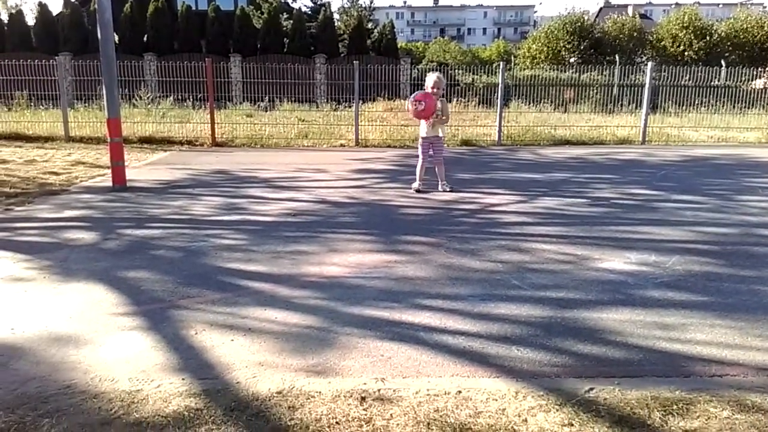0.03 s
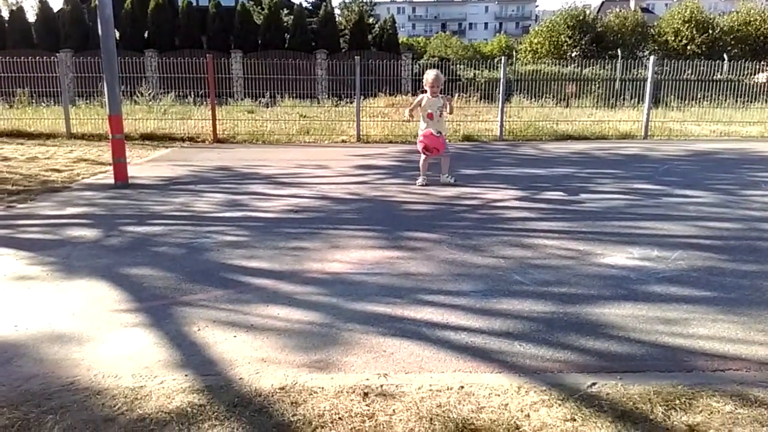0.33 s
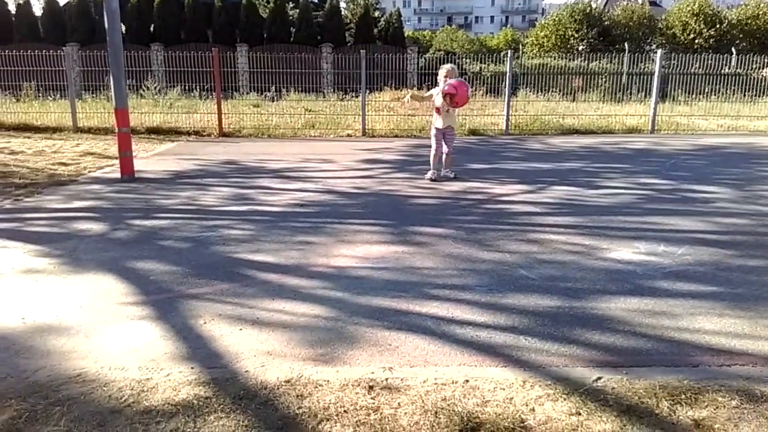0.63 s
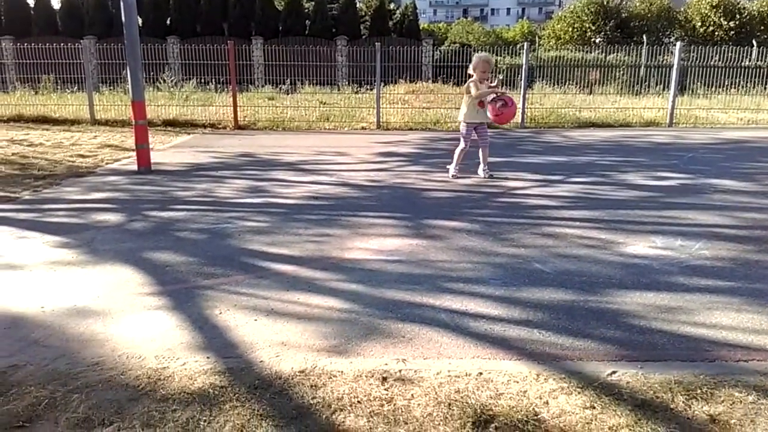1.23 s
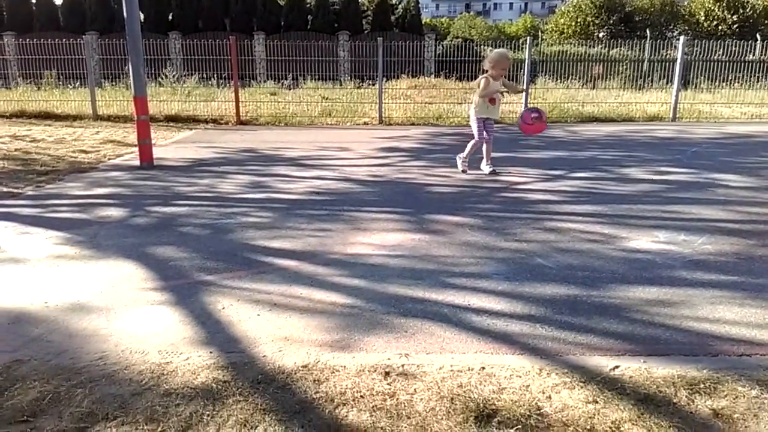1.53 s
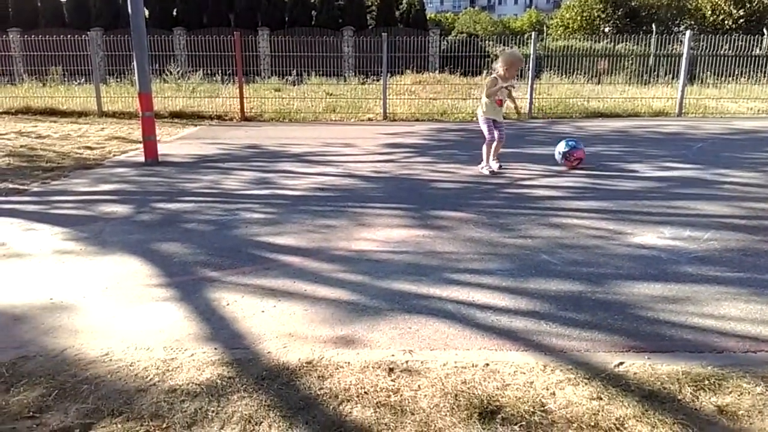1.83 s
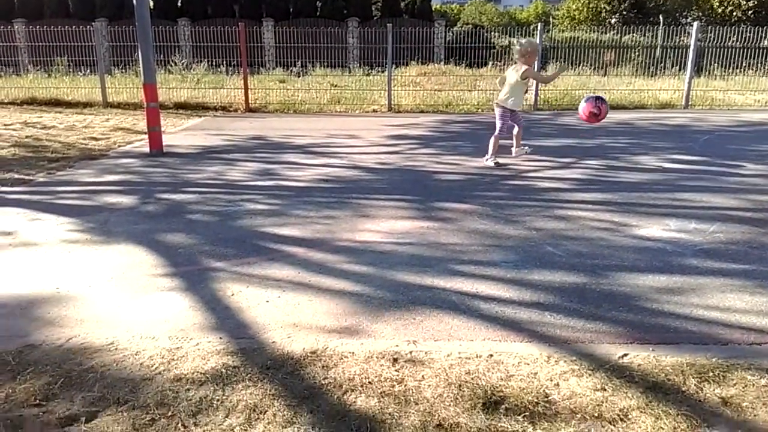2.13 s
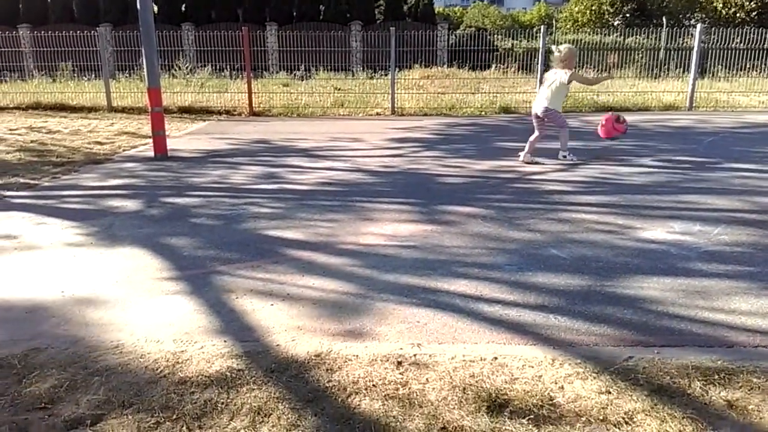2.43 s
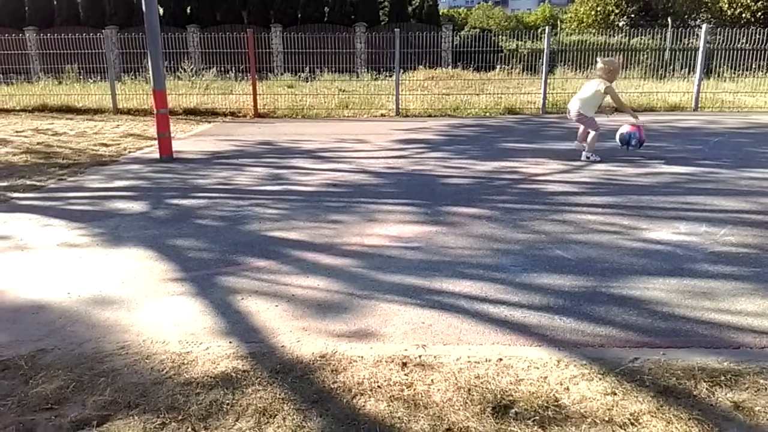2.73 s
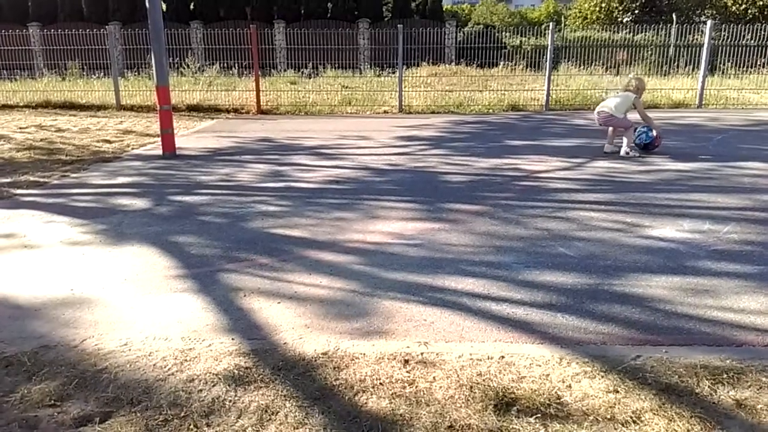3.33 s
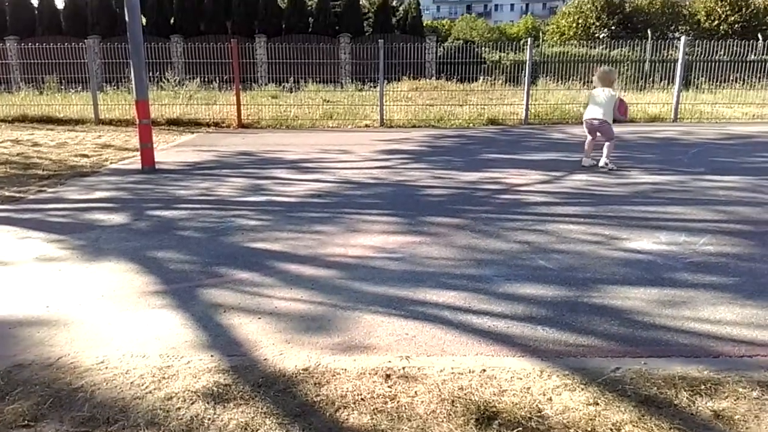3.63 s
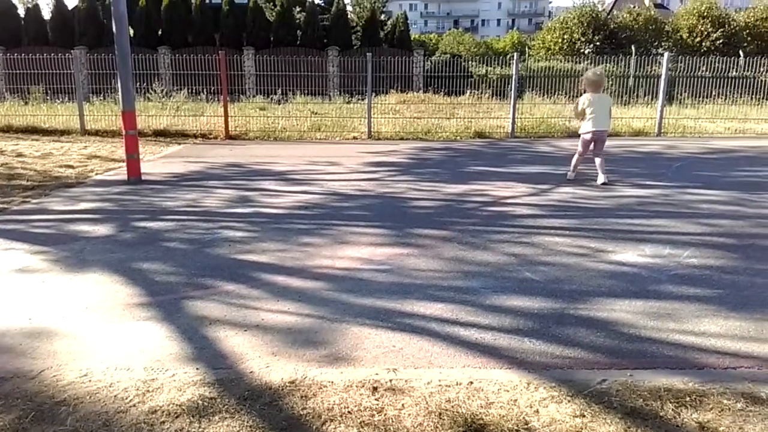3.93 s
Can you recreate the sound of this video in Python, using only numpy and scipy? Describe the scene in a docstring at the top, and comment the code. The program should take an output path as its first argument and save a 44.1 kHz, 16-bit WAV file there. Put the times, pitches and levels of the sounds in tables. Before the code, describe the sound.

A plastic ball bounces on an open paved court at about 0.3, 0.9, 1.5, 1.9, 2.4 and 2.9 seconds, sharp, briefly ringing slaps that grow softer. A far bird whistles very faintly at 0.6. Shoes and hands tap lightly from 1.2 to 3.3 seconds. A breeze rises, buffeting the microphone on the right, hardest around 3.4 seconds. Distant traffic rumbles and hisses quietly throughout.

```python
"""An open paved court, over the rumble and hiss of far traffic. An air-filled plastic ball bounces six
times, lower each time, drifting right: a sharp slap, a short ring of skin and trapped air, a soft thump
and a faint tail from fences and trees. Hollow tones linger after the first bounce, then a far bird
whistles once. Between the later bounces shoes and hands start to tap and a breeze rises, buffeting the
microphone hardest near the end, as the ball is picked up."""
import sys
import numpy as np
from scipy import signal
from scipy.fft import rfft, irfft
from scipy.io import wavfile

SR = 44100
rng = np.random.default_rng(int(sys.argv[2]) if len(sys.argv) > 2 else 0)


def put_to_file(sound):
    """Save the sound as 16-bit audio at rate SR, in the file named by the first command-line argument."""
    columns = np.atleast_2d(sound).T  # one column per channel
    safe = np.clip(columns, -1, 1)
    whole_steps = np.round(safe * 32767)
    wavfile.write(sys.argv[1], SR, whole_steps.astype(np.int16))


N = 176400


def amp(db):
    """Decibels to gain."""
    return 10 ** (np.asarray(db) / 20)


def read(points, hz):
    """Reads a curve of (frequency [Hz], value) along a log-frequency axis."""
    freqs, values = np.transpose(points)
    return np.interp(np.log(hz + 1), np.log(freqs + 1), values)


def unit(x):
    """Scales to rms 1."""
    return x / np.sqrt(np.mean(x ** 2) + 1e-20)


def add(mix, start, sound):
    """Mixes a sound in at start seconds."""
    part = mix[..., max(round(start * SR), 0):][..., :sound.shape[-1]]
    part += sound[..., :part.shape[-1]]


def noise(spectrum):
    """A steady noise bed of rms 1 with the given spectrum."""
    gain = amp(read(spectrum, np.fft.rfftfreq(N, 1 / SR)))
    return unit(irfft(rfft(rng.standard_normal(N)) * gain, N))


def colour(x, eq, tilt_db=0, size=4096):
    """Minimum-phase EQ, tilted by tilt_db per octave about 2500 Hz."""
    hz = abs(np.fft.fftfreq(size, 1 / SR))
    log_gain = np.log(amp(read(eq, hz) + tilt_db * np.log2(np.clip(hz, 400, 8000) / 2500)))
    response = np.exp(np.conj(signal.hilbert(log_gain)))
    impulse = np.fft.ifft(response).real[:size // 2]
    return signal.fftconvolve(x, impulse)[:len(x)]


def decay(t, t60):
    """An envelope that falls 60 dB in t60 seconds."""
    return np.exp(-np.log(1000) * t / t60)


def ringing(band_t60s, size):
    """Dense random ringing of energy 1, each band dying at its own speed."""
    t, hz = np.arange(size) / SR, np.fft.rfftfreq(size, 1 / SR)
    white = rfft(rng.choice([-1., 1.], size))
    centres, t60s = np.transpose(band_t60s)
    out = np.zeros(size)
    for solo, t60 in zip(np.eye(len(centres)), t60s):
        band = read(list(zip(centres, solo)), hz)
        out += irfft(white * band, size) * decay(t, t60)
    return out / np.linalg.norm(out)


def traffic():
    """Far traffic: a centred rumble under a wide, steady hiss."""
    # Spectra of the two beds: (frequency [Hz], level [dB])
    rumble_eq = [(20, -24.5), (70, 0.5), (110, 1.5), (155, -8), (300, -12.5), (420, -23.5), (3000, -69)]
    hiss_eq = [(20, -8.5), (200, -3.5), (450, -2), (950, 0), (1400, -3.5), (2100, -2.5), (2800, -10),
               (4500, -13.5), (8000, -18.5), (16000, -25)]
    rumble_db, hiss_db, right_lift_db = -53.5, -61.5, 1.5
    hiss = np.array([noise(hiss_eq), amp(right_lift_db) * noise(hiss_eq)])
    return amp(rumble_db) * noise(rumble_eq) + amp(hiss_db) * hiss


def skin_slap(t, level_db, tilt_db, crack_db):
    """The skin hits the paving with a click and rattles; harder hits click more sharply."""
    # Tone of the slap: (frequency [Hz], level [dB])
    slap_eq = [(150, -6.5), (270, -2), (450, -5.5), (1000, 2.5), (1550, -7.5), (2100, -3), (2950, -6),
               (3700, -5), (5000, -6), (7000, -6), (9500, -5), (12000, -17.5), (16000, -28)]
    # Damping of the skin: (frequency [Hz], T60 [s])
    skin_t60s = [(300, 0.085), (1000, 0.054), (3000, 0.053), (6000, 0.022), (12000, 0.02)]
    # High shelf that sets the crack: (frequency [Hz], share of crack_db [ratio])
    crack_shelf = [(6000, 0), (9500, 0.94)]
    skin_db, attack_s, click_db_per_db = -2, 0.0001, 2.55
    click = amp(click_db_per_db * level_db) * (t == 0)
    skin = amp(skin_db) * ringing(skin_t60s, len(t)) * (1 - np.exp(-t / attack_s))
    eq = [(hz, db + crack_db * read(crack_shelf, hz)) for hz, db in slap_eq]
    return amp(level_db) * colour(click + skin, eq, tilt_db)


def air_ring(t, level_db, tilt_db):
    """The trapped air rings, its modes slightly detuned on every bounce."""
    # Cavity modes: (pitch [Hz], relative level [dB], T60 [s])
    modes = [(732, 5, 0.02), (1200, -5, 0.043), (2052, 1, 0.022), (3010, 6.5, 0.019), (3038, 0.5, 0.029),
             (3010, -27.5, 0.55), (4070, -7.5, 0.05), (5010, -6, 0.036), (5900, 1, 0.017)]
    detune = 0.0092
    out = np.zeros(len(t))
    for hz, db, t60 in modes:
        low_tilt_db = tilt_db * min(np.log2(hz / 2900), 0)
        tone = np.sin(2 * np.pi * hz * rng.normal(1, detune) * t) * rng.choice([-1, 1])
        out += amp(level_db + db + low_tilt_db) * decay(t, t60) * tone
    return out


def squash_thump(t, level_db, hz, lag_s):
    """The squashed ball pushes out a low thump whose pitch sags during contact."""
    contact_s, attack_s, sag = 0.011, 0.0013, 0.25
    age = np.maximum(t - lag_s, 0)
    cycles = hz * age * (1 - sag * np.minimum(age / contact_s, 2) / 2)
    envelope = (1 - np.exp(-age / attack_s)) * np.exp(-(age / contact_s) ** 2)
    return amp(level_db) * envelope * np.cos(2 * np.pi * cycles)


def dent_pop(t, level_db):
    """The dent springs back with a short pop."""
    lag_s, hz, decay_s = 0.0052, 269, 0.0022
    age = np.maximum(t - lag_s, 0)
    return amp(level_db) * np.sin(2 * np.pi * hz * age) * np.exp(-age / decay_s)


def ball(size=8192):
    """Six layered bounces, reaching the left ear ever later as the ball drifts right."""
    # Hits: (time [s], slap [dB], tilt [dB/octave], crack [dB], air ring [dB], thump [dB],
    # thump pitch [Hz], thump lag [s], pop [dB], crack left minus right [dB])
    bounces = [(0.2967, -1, 0.5, -7.5, -42, -24, 143, 0.00014, -29, 9.5),
               (0.9463, -4, 1.7, -2.5, -38, -26, 111, 0.00028, -31.5, 9.5),
               (1.4653, -7, 1, 0, -39, -27, 115.5, 0.00075, -31.5, 3.5),
               (1.9134, -10.5, -1, -0.5, -48.5, -34, 176, 0.0042, -28.5, 10),
               (2.4291, -10.5, 4.6, -13, -43.5, -38, 90, 0.0054, -45.5, 5),
               (2.8683, -15, 3.2, -23, -44.5, -44, 110, 0.0054, -57, 18)]
    drift_s_per_s = 0.00005
    out, t = np.zeros((2, N)), np.arange(size) / SR
    for start, slap_db, tilt_db, crack_db, air_db, thump_db, hz, lag_s, pop_db, pan_db in bounces:
        body = air_ring(t, air_db, tilt_db) + squash_thump(t, thump_db, hz, lag_s) + dent_pop(t, pop_db)
        left = skin_slap(t, slap_db, tilt_db, crack_db + pan_db / 2)
        right = skin_slap(t, slap_db, tilt_db, crack_db - pan_db / 2)
        add(out[0], start + drift_s_per_s * start, left + body)
        add(out[1], start, right + body)
    return out


def court_echo(send):
    """Fences and trees scatter back a thin, short tail."""
    # Tone of the tail: (frequency [Hz], level [dB])
    tail_eq = [(100, -21), (2000, -3), (5000, 2), (9500, -0.5), (15000, 1)]
    # Length of the tail: (frequency [Hz], T60 [s])
    tail_t60s = [(200, 0.12), (4500, 0.22), (15000, 0.25)]
    return_db, attack_s = -14.5, 0.0033
    swell = np.minimum(np.arange(SR) / SR / attack_s, 1) ** 2
    tails = [colour(ringing(tail_t60s, SR) * swell, tail_eq) for _ in send]
    return amp(return_db) * np.array([signal.fftconvolve(x, tail)[:N] for x, tail in zip(send, tails)])


def hollow_tones(size=16384):
    """Faint, uneven tones linger after the first and hardest bounce."""
    # Narrow bands of noise: (time [s], centre [Hz], level [dB])
    tones = [(0.317, 4330, -61), (0.32, 5100, -59.5)]
    width_hz, attack_s, t60 = 330, 0.009, 0.25
    out, t = np.zeros((2, N)), np.arange(size) / SR
    envelope = (1 - np.exp(-t / attack_s)) * decay(t, t60)
    for start, hz, db in tones:
        band = 1 / (1 + (2 * (np.fft.rfftfreq(size, 1 / SR) - hz) / width_hz) ** 2)
        tone = unit(irfft(rfft(rng.standard_normal((2, size))) * band))
        add(out, start, amp(db) * envelope * tone)
    return out


def bird(level_db=-68):
    """A far bird gives one faint rising whistle."""
    # Glide of the whistle: (time [s], pitch [Hz])
    glide = [(0.55, 2190), (0.62, 2220), (0.70, 2340)]
    times, hz = np.transpose(glide)
    out, t = np.zeros((2, N)), np.arange(times[0], times[-1], 1 / SR)
    whistle = np.sin(2 * np.pi * np.cumsum(np.interp(t, times, hz)) / SR)
    add(out, times[0], amp(level_db) * signal.windows.tukey(len(t), .4) * whistle)
    return out


def taps(size=4096):
    """Soles and palms land, each a dull knock with a scuff of grit."""
    # Contacts: (time [s], knock [dB], scuff [dB])
    contacts = [(1.242, -25, -37.5), (1.737, -26, -35), (2.293, -14, -53), (2.623, -19, -36),
                (3.140, -25, -25), (3.306, -13, -33.5)]
    # Tone of the two layers: (frequency [Hz], level [dB])
    knock_eq = [(150, 6), (600, -0.5), (1150, -3), (1900, -10), (4000, -42), (16000, -61)]
    scuff_eq = [(300, -48), (2000, -3), (3000, 5.5), (5500, -2.5), (9000, -4.5), (16000, -45)]
    scuff_decay_s, stereo_width = 0.0077, 0.36
    out, t = np.zeros((2, N)), np.arange(size) / SR
    for start, knock_db, scuff_db in contacts:
        knock = amp(knock_db) * colour(1. * (t == 0), knock_eq)
        *sides, centre = rng.standard_normal((3, size)) * np.exp(-t / scuff_decay_s)
        for ear, side in zip(out, sides):
            grit = centre + stereo_width * side
            scuff = amp(scuff_db) * colour(grit / np.linalg.norm(grit), scuff_eq)
            add(ear, start, knock + scuff)
    return out


def wind():
    """Turbulence swells and ebbs at both microphone ports while eddies buffet the right one."""
    # Strength of the breeze: (time [s], left [dB], right [dB])
    breeze = [(1.2, -60, -80), (1.62, -50.5, -47.5), (1.98, -59, -64), (2.076, -34.5, -50),
              (2.15, -56, -87), (2.68, -65, -57), (2.8, -53, -41.5), (3.02, -60, -41.5), (3.15, -39.5, -39),
              (3.23, -38, -44), (3.381, -49, -38.5), (3.53, -39.5, -27.5), (3.79, -50, -44.5),
              (3.87, -45, -28.5), (4, -41.5, -46.5)]
    # Low rumble of turbulence: (frequency [Hz], level [dB])
    turbulence_eq = [(20, -14), (65, 2), (130, -7.5), (280, -17), (450, -32), (2000, -94)]
    # Eddies: (centre time [s], level [dB], pitch [Hz], edge [dB/octave])
    buffets = [(1.291, -27.5, 70, -1.5), (1.427, -28.5, 85, -4), (2.747, -23, 108, 2.5),
               (2.785, -24.5, 181, -2.5), (2.964, -20.5, 99.4, -3.5), (3.082, -23.5, 148, 0),
               (3.112, -18.5, 114, 1.5), (3.126, -19, 107, -0.5), (3.139, -19.5, 153, -0.5),
               (3.176, -17, 92, 1), (3.309, -25.5, 190, 4.5), (3.346, -24, 98, -4), (3.399, -11, 147, 2.5),
               (3.409, -11.5, 140, -6), (3.474, -11.5, 153, -2.5), (3.508, -18, 197, -1.5),
               (3.580, -17, 131, 2), (3.599, -18, 134, 9.5), (3.68, -19, 137, -2), (3.702, -18.5, 130, 3.5),
               (3.734, -21, 118, -1), (3.861, -20.5, 133, 2), (3.886, -21, 125, 0.5)]
    times, *ports = np.transpose(breeze)
    t = np.arange(N) / SR
    out = np.array([amp(np.interp(t, times, db)) * noise(turbulence_eq) for db in ports])
    for centre_s, db, hz, edge_db in buffets:
        thump = eddy(db, hz, edge_db)
        add(out[1], centre_s - len(thump) / SR / 2, thump)
    return out


def eddy(level_db, hz, edge_db, size=8192):
    """One pressure thump, centred in its window, with a little churning air around it."""
    # Tone of the thump: (frequency [multiple of pitch], level [dB])
    eddy_eq = [(0.15, -32), (0.5, -5.5), (1.1, -2), (2, -15.5), (4, -28), (8, -52.5), (30, -84)]
    churn_db, churn_s = -8, 0.016
    t, freqs = (np.arange(size) - size // 2) / SR, np.fft.rfftfreq(size, 1 / SR)
    churn = rng.standard_normal(size) * np.exp(-abs(t) / churn_s)
    push = (t == 0) + amp(churn_db) * churn / np.linalg.norm(churn)
    octaves_up = np.clip(np.log2((freqs + 1) / hz), 0, 2)
    gain = amp(read([(ratio * hz, db) for ratio, db in eddy_eq], freqs) + edge_db * octaves_up)
    phase_turn = np.exp(2j * np.pi * rng.random())
    return amp(level_db) * irfft(rfft(push) * gain * phase_turn) / gain.mean()


def scene():
    """Ball and taps feed the court's echo; the other layers stay dry."""
    near = ball() + taps()
    return near + court_echo(near) + hollow_tones() + wind() + traffic() + bird()


def record(dry):
    """A steep low-pass trims the very top of the mix."""
    cutoff_hz = 15900
    low_pass = signal.firwin(511, cutoff_hz, window=("kaiser", 9), fs=SR)
    return signal.oaconvolve(dry, low_pass[None], "same", axes=1)


dry = scene()
out = record(dry)
put_to_file(out)
```